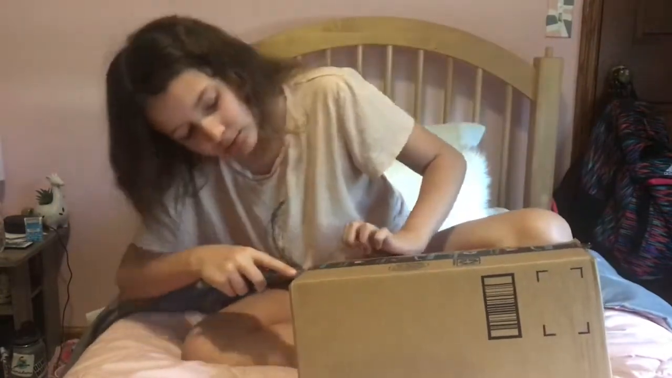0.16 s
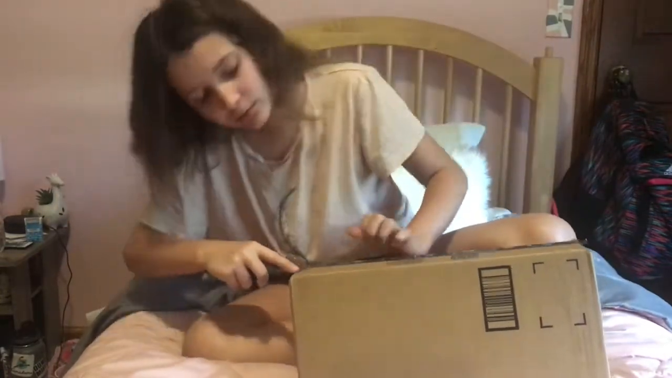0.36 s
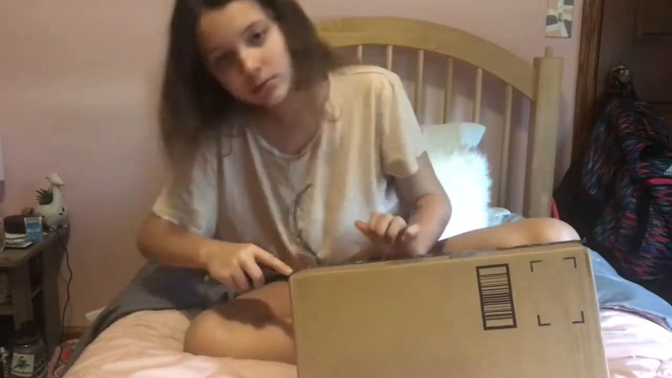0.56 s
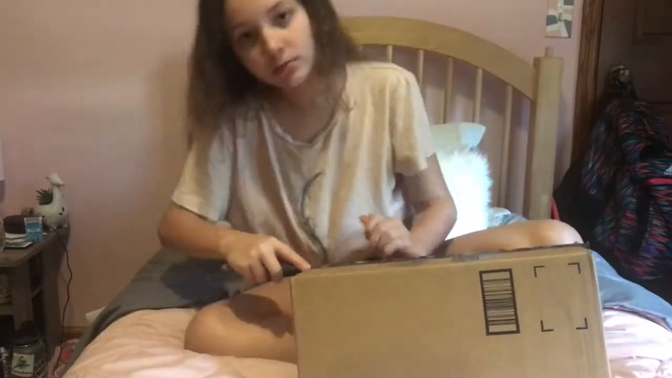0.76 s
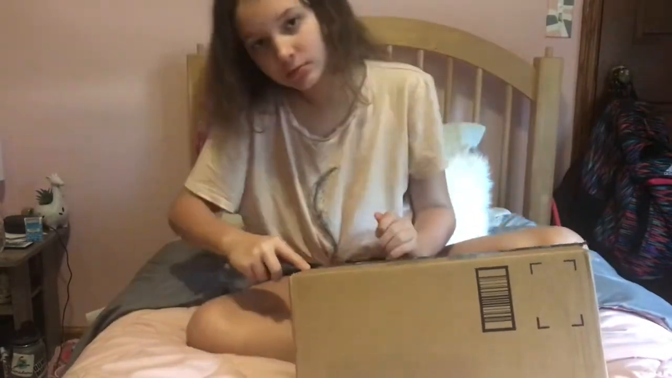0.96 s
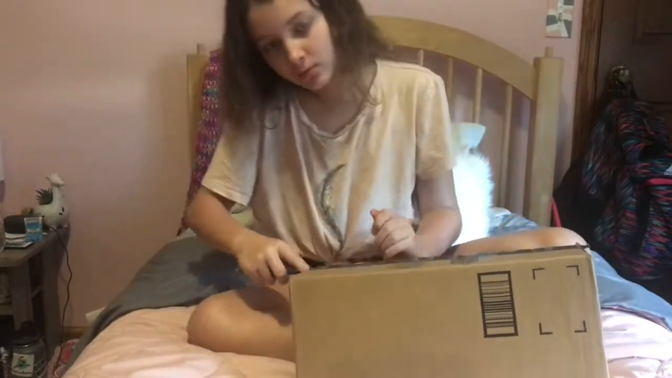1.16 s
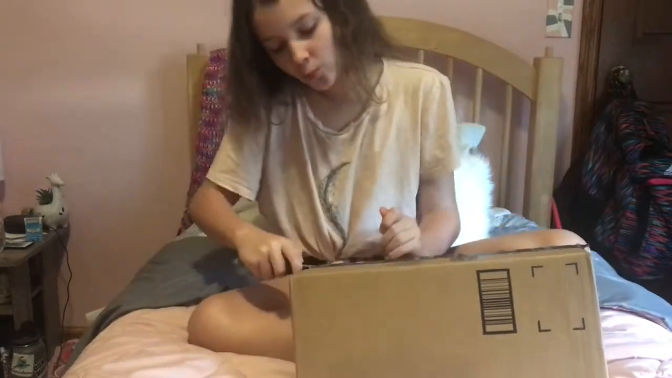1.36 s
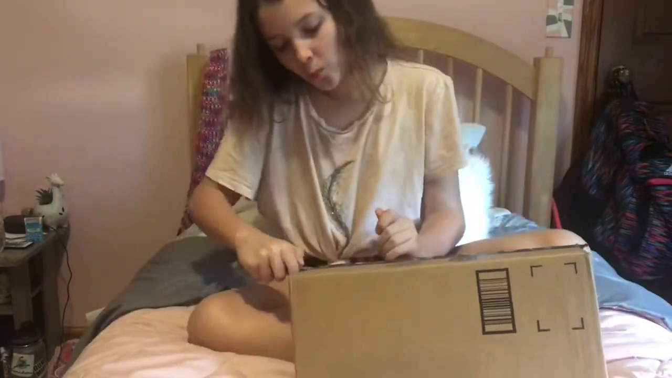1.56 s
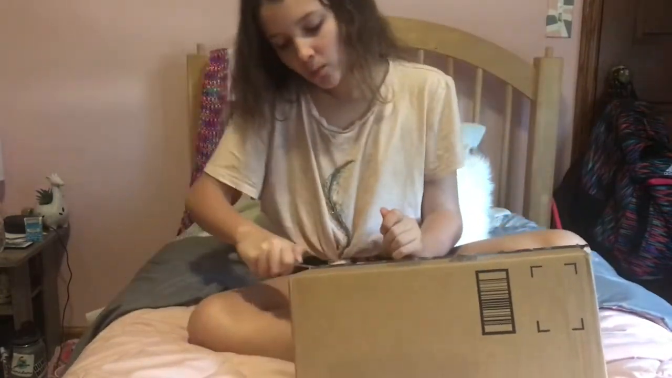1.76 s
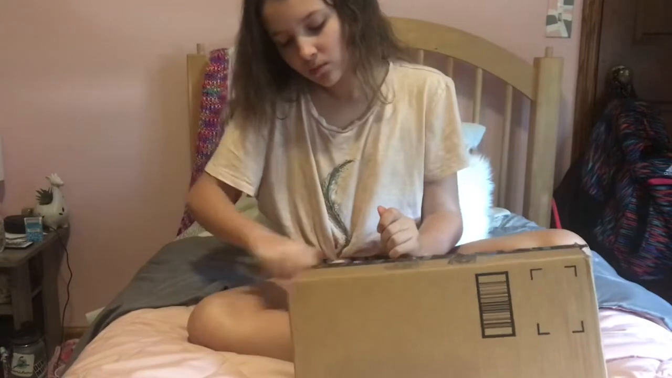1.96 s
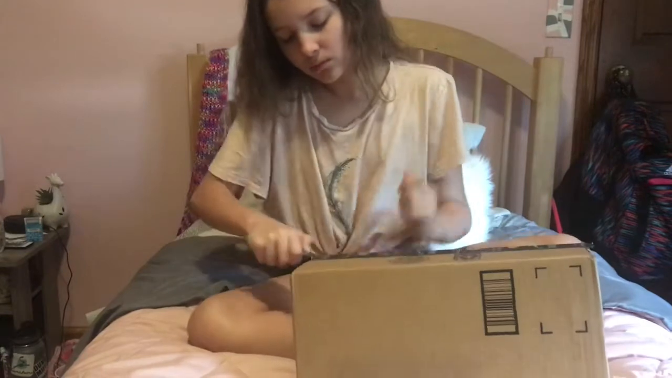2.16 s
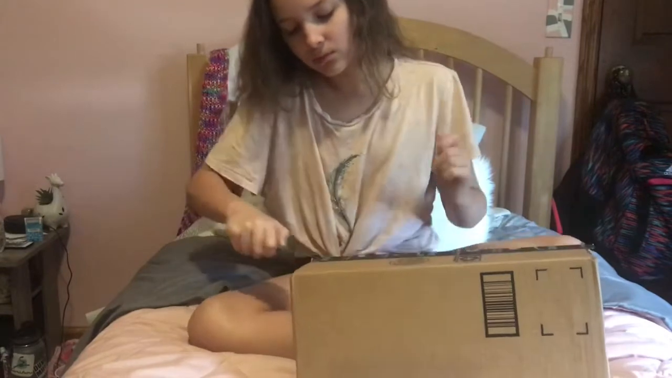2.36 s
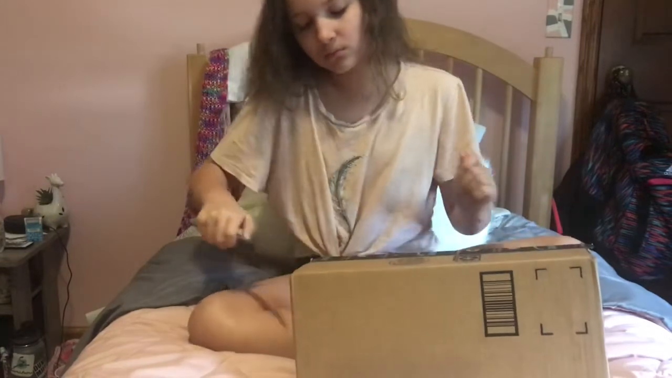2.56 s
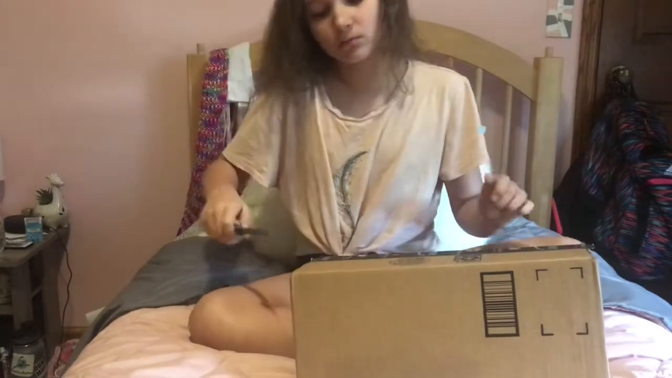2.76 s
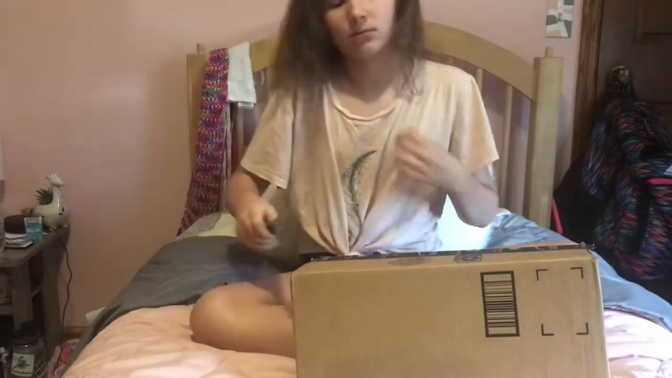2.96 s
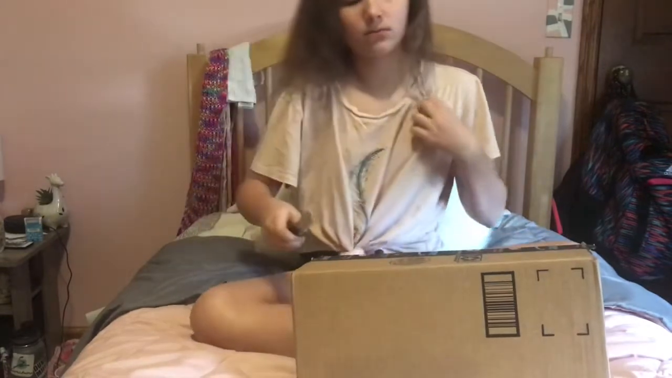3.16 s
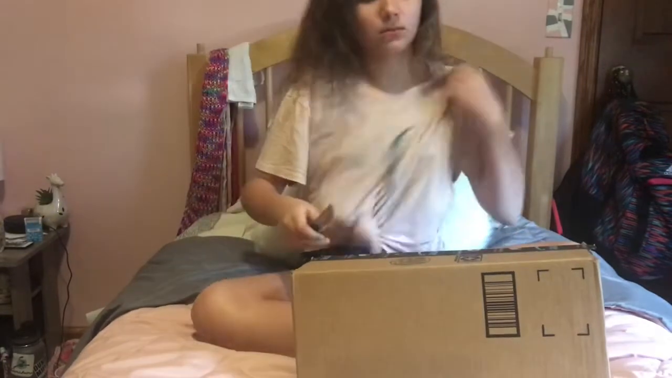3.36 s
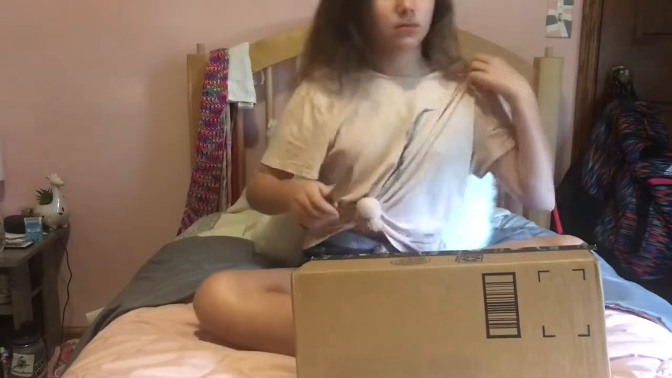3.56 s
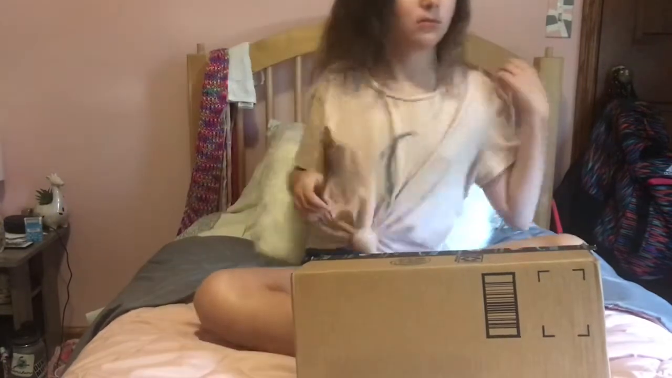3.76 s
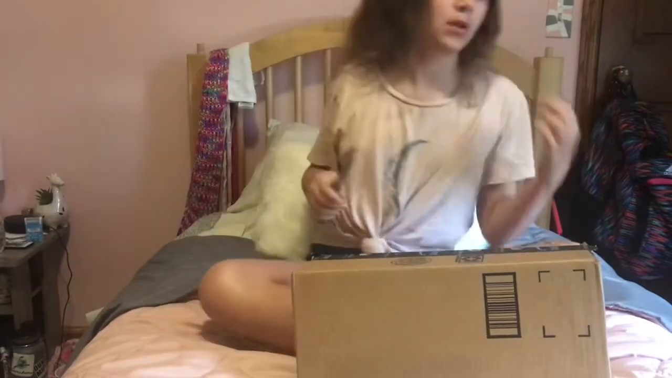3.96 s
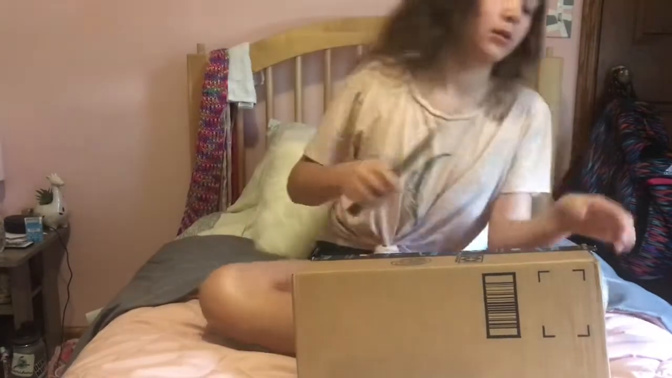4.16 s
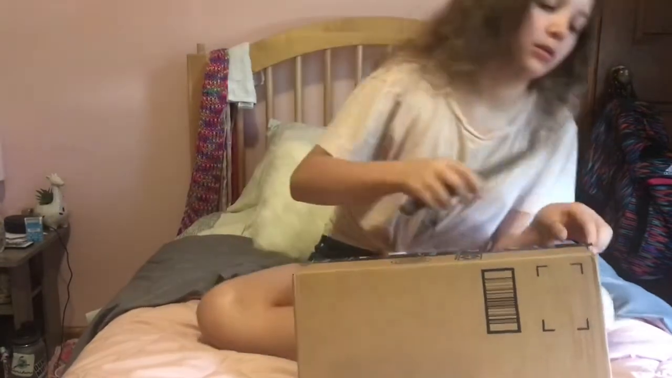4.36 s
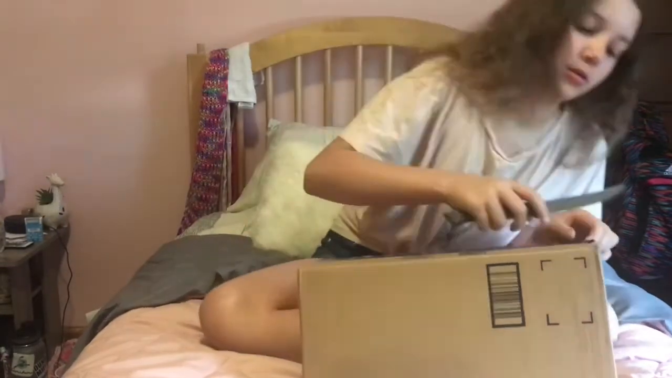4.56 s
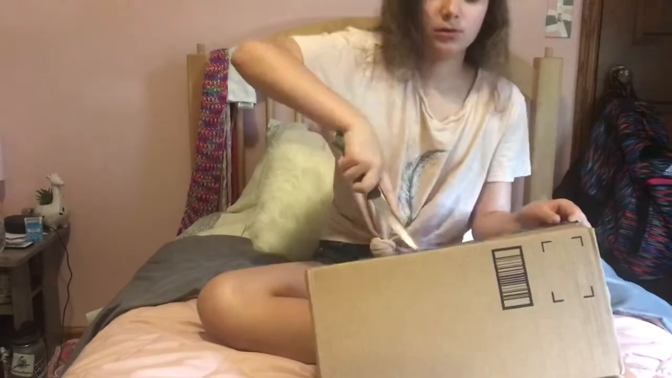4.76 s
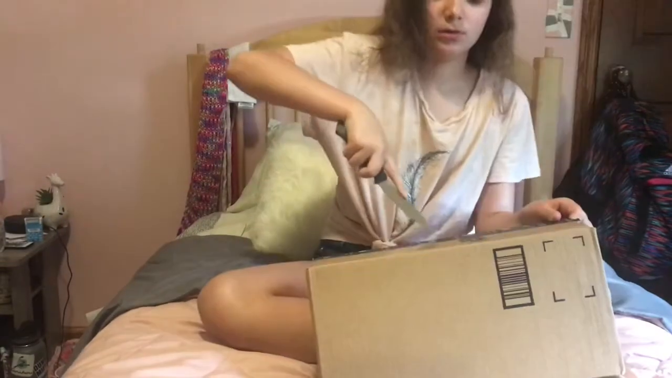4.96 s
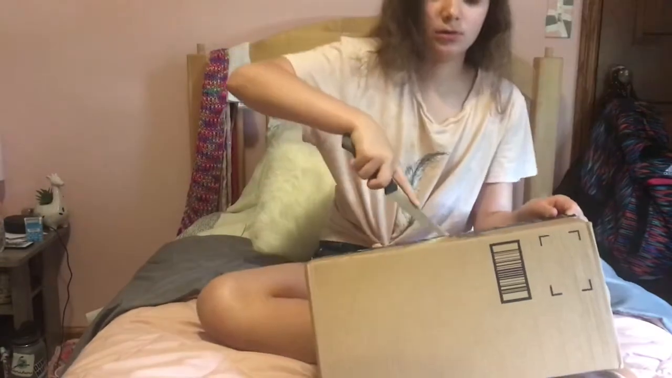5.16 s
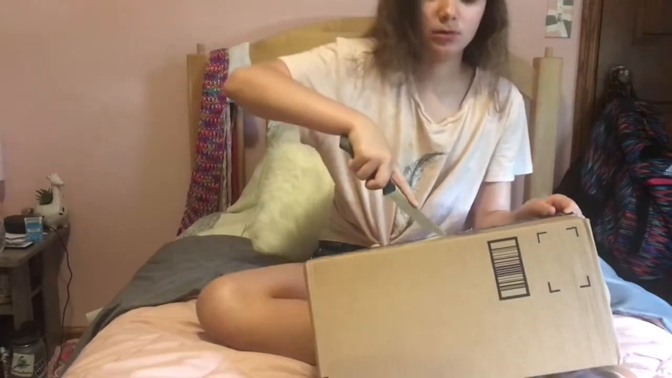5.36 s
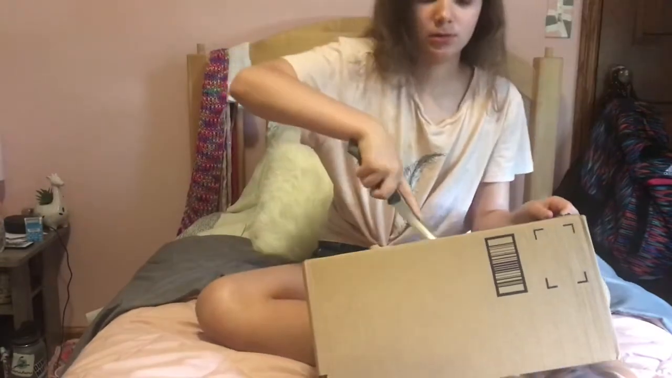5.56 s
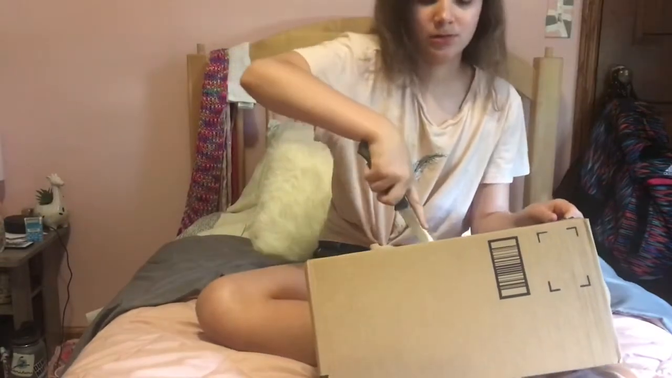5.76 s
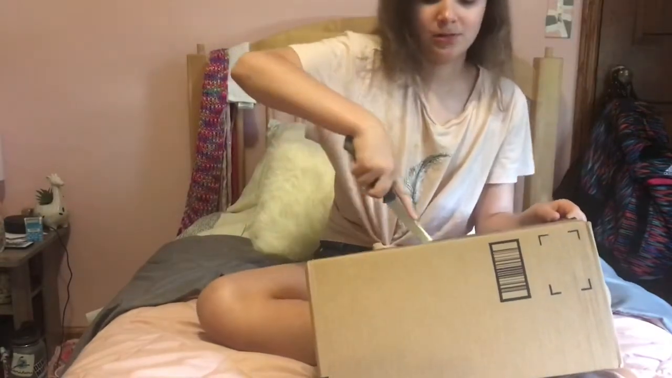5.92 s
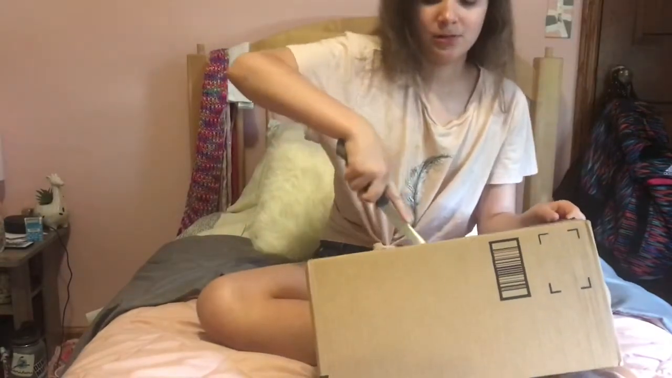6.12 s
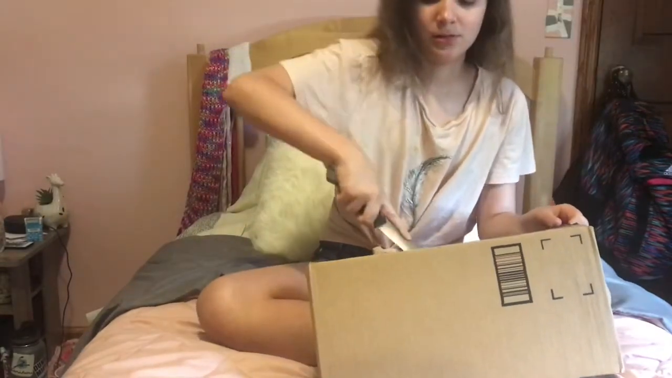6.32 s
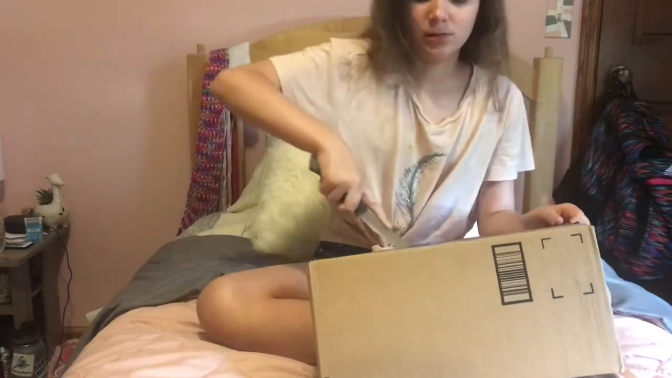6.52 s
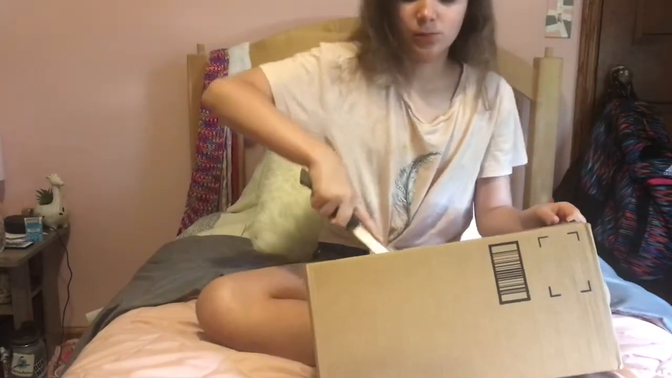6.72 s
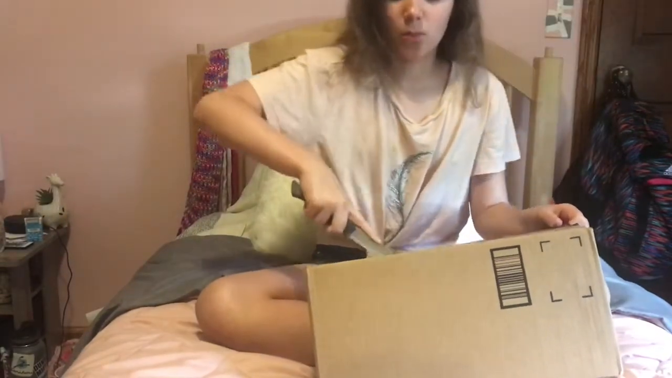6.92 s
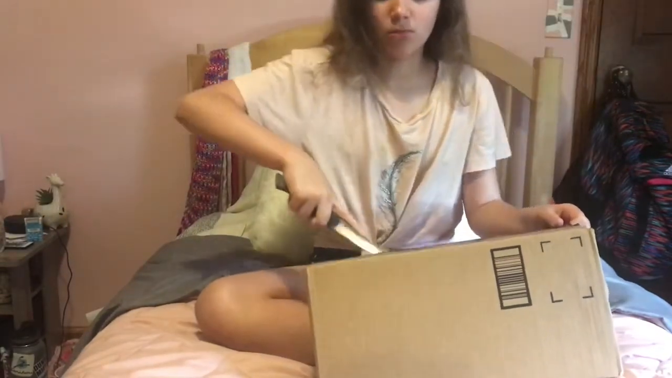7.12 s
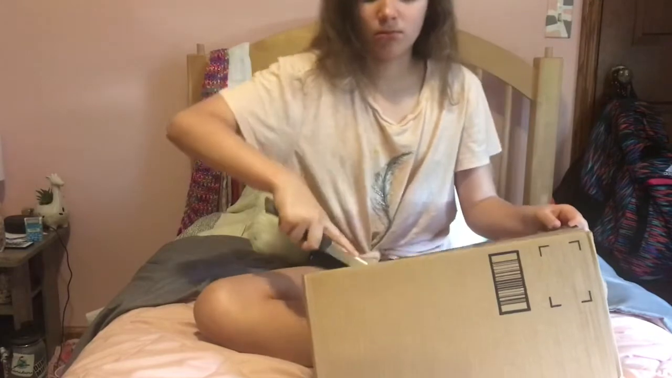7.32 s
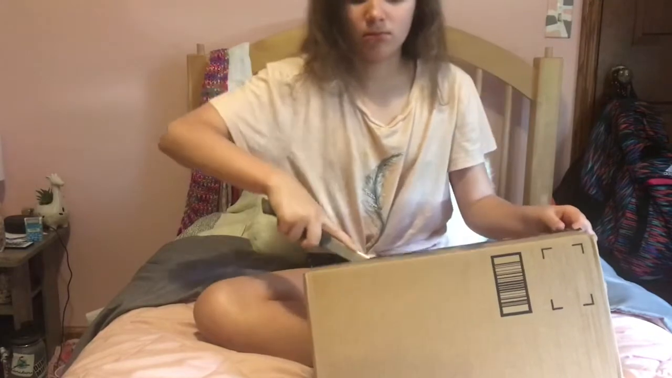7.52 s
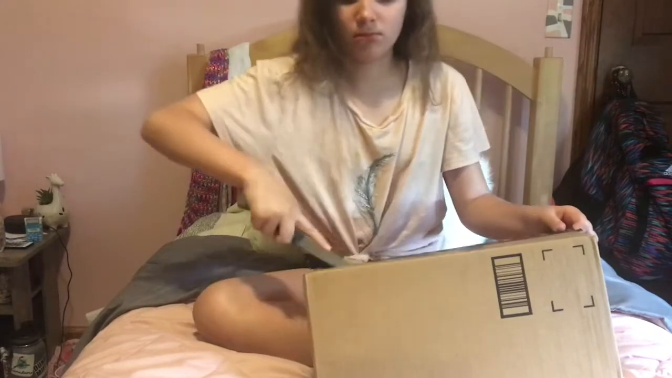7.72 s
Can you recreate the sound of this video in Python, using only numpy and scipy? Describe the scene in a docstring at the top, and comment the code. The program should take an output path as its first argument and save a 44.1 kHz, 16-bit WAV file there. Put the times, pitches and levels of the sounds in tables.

```python
"""Tape snaps, a hollow box drums, a knife rasps along the seam and squeaks, over mains hum and faint hiss.
A knife tip is pushed and sawn through packing tape on a cardboard box in a small soft bedroom.
Snaps and knocks are pushes and noise bursts ringing box modes; rubbing is uneven grit through the same modes.
Squeaks are trembling sines; the room is decaying banded noise convolved with the box and squeaks."""
import sys
import numpy as np
from scipy import signal
from scipy.fft import rfft, irfft
from scipy.io import wavfile
from scipy.ndimage import uniform_filter1d

SR = 44100
rng = np.random.default_rng(int(sys.argv[2]) if len(sys.argv) > 2 else 0)


def log_audio(samples):
    """Write samples as a 16-bit WAV file to the path given in sys.argv[1]."""
    # one column per channel
    frames = np.atleast_2d(samples).T
    # limit to full scale, then quantise
    limited = np.clip(frames, -1, 1)
    pcm = np.round(limited * 32767).astype(np.int16)
    wavfile.write(sys.argv[1], SR, pcm)


N = 347728

# modes of the hollow box: f/Hz, level/dB, t60/s (nominal; some sources shorten it)
DRUM_MODES = [(140, -30, 0.33), (195.5, -0.5, 0.11), (247, 3, 0.044), (272.3, -0.5, 0.041),
              (308, -0.5, 0.077), (385, -3.5, 0.061), (433.7, 1, 0.048), (541, 2, 0.033),
              (562, -4.5, 0.0092)]
# modes of the card panels: f/Hz, level/dB, t60/s (nominal; some sources shorten it)
PANEL_MODES = [(660, 1.5, 0.011), (761, -5.5, .03), (889, -12, 0.064), (1036, -4, 0.017),
               (1180, -6.5, 0.018), (1345, -2.5, 0.011), (1440, 7, 0.0088), (1624, -2, 0.0085),
               (1745, 1.5, 0.0058), (1980, -7, 0.017), (2050, 0, 0.0085), (2135, -10, 0.016)]
# treble at the microphone, rippled by nearby surfaces: f/Hz, relative level/dB per Hz
TREBLE = [(1500, -16), (2400, -0.5), (3100, 2), (3900, -2), (4600, -2.5), (5300, -5), (6500, -2.5),
          (7600, -5.5), (8800, 0), (10500, -8.5), (12000, -5.5), (13300, -8), (14300, -11), (15800, -13)]


def undb(db):
    """Amplitude ratio of a level in dB."""
    return 10 ** (np.asarray(db) / 20)


def level(x, db):
    """Scale x to an RMS level in dB."""
    return x * undb(db) / np.sqrt(np.mean(x ** 2))


def colour(x, table, size=4096):
    """Minimum-phase filter of the (f/Hz, level/dB) points, by folded cepstrum; tap energy 1."""
    f_hz, gain_db = np.transpose(table)
    grid_hz = np.maximum(np.arange(size // 2 + 1) * SR / size, 1)
    cepstrum = irfft(np.log(undb(np.interp(np.log(grid_hz), np.log(f_hz), gain_db))))
    cepstrum[1:size // 2] *= 2
    cepstrum[size // 2 + 1:] = 0
    taps = irfft(np.exp(rfft(cepstrum)))
    taps = taps / np.sqrt(np.sum(taps ** 2))
    return signal.fftconvolve(x, taps)[:len(x)]


def ring(x, f_hz, t60_s):
    """One decaying mode, t60 at least 5 ms; a unit push starts a swing of size 1."""
    decay_per_sample = np.log(1000) / (max(t60_s, .005) * SR)
    pole = np.exp(2j * np.pi * f_hz / SR - decay_per_sample)
    return signal.lfilter([0, pole.imag], [1, -2 * pole.real, abs(pole) ** 2], x)


def walk(rate_hz):
    """Random levels held 1 / rate_hz and slewed twice; spread near 1."""
    hold = int(SR / rate_hz)
    steps = np.repeat(rng.standard_normal(N // hold + 1), hold)
    return 1.02 * uniform_filter1d(uniform_filter1d(steps, hold), hold)[:N]


def grit(scatter_db):
    """Noise of grains of uneven size, RMS 1."""
    grain_db = scatter_db * rng.exponential(size=N)
    return level(rng.standard_normal(N) * undb(grain_db), 0)


def blows(modes, at, db, tilt_db_per_oct, judder_s, clean, scatter_db=3.0):
    """Each blow excites the modes in its own mix; share `clean` is one push, the rest noisy judder."""
    scatter = scatter_db * rng.standard_normal((len(at), len(modes)))
    decay = np.exp(-1 / (max(judder_s, 1e-4) * SR))
    middle_oct = np.mean(np.log2(np.array(modes)[:, 0]))
    out = 0
    for k, (f_hz, mode_db, t60_s) in enumerate(modes):
        tilt_db = tilt_db_per_oct * (np.log2(f_hz) - middle_oct)
        push = np.zeros(N)
        push[at] = undb(db + mode_db + tilt_db + scatter[:, k])
        envelope = signal.lfilter([np.sqrt(1 - decay ** 2)], [1, -decay], push)
        shake = envelope * rng.standard_normal(N)
        out = out + ring(clean * push + (1 - clean) * shake, f_hz, t60_s)
    return out


def background():
    """Mains hum with two weaker wavering tones (noise-driven resonances), over rumble and hiss."""
    # two wavering tones, then the hum (only its level is used): f/Hz, level/dB
    hum_tones = [(59.2, -66), (86.1, -97), (118.4, -54.5)]
    # rumble and hiss: f/Hz, relative level/dB per Hz
    air = [(15, -33), (25, -11), (64, -26), (94, -12), (123, -9), (149, -24), (175, -25.5), (263, -24),
           (463, -31), (1100, -33), (4870, -44.5), (12900, -46.5), (16000, -56)]
    hum_hz, air_db = 119.9, -63.5
    t = np.arange(N) / SR
    hum = level(np.sin(2 * np.pi * hum_hz * t), hum_tones[2][1] + 0.87)
    hum = hum * undb(0.29 * walk(2))
    wavering = sum(level(ring(rng.standard_normal(N), f_hz, 0.65), db) for f_hz, db in hum_tones[:2])
    hiss = level(colour(rng.standard_normal(N), air, size=16384), air_db)
    return hum + wavering + hiss


def tail():
    """Soft walls: octave bands of noise, each dying at its own pace, after a soft onset; energy 1."""
    # room decay: f/Hz, t60/s
    room_t60 = [(150, 0.29), (700, 0.39), (2000, 0.39), (5000, 0.39), (13000, 0.25)]
    onset_s = 0.007
    t = np.arange(int(.5 * SR)) / SR
    table_hz, table_t60_s = np.transpose(room_t60)
    out = 0
    for f_hz in 88 * 2. ** np.arange(8):
        edges_hz = [f_hz / np.sqrt(2), f_hz * np.sqrt(2)]
        band = signal.butter(2, edges_hz, "band", fs=SR, output="sos")
        t60_s = np.interp(np.log(f_hz), np.log(table_hz), table_t60_s)
        out = out + 1000. ** (-t / t60_s) * signal.sosfilt(band, rng.standard_normal(len(t)))
    out = out * (1 - np.exp(-(t / onset_s) ** 2))
    return out / np.sqrt(np.sum(out ** 2))


def room(x):
    """Room answer: two independent noise tails, slowly exchanged while the sound runs."""
    room_db, exchange_hz = -5, .4
    turn = 2 * np.pi * exchange_hz * np.arange(N) / SR
    shares = (np.cos(turn), np.sin(turn))
    return undb(room_db) * sum(signal.fftconvolve(x * share, tail())[:N] for share in shares)


def squeaks():
    """The blade sticks and slips almost evenly: short rough sines of trembling pitch and size."""
    # t/s, length/s, centre f/Hz, level/dB (before swell), pitch tremble/share
    squeak_rows = [(.045, .11, 520, -50, .12), (.665, .03, 310, -45, .1), (1.775, .035, 440, -44, .1),
                   (1.922, .042, 1170, -31, .07), (2.08, .08, 3450, -48, .1),
                   (2.283, .048, 880, -47.5, .06), (3.977, .018, 4100, -52, .05),
                   (4.05, .3, 1700, -67, .07), (4.475, .06, 1450, -62, .07), (7.25, .015, 2070, -33, .03)]
    out = np.zeros(N)
    waver = walk(1100)
    swell = undb(0.91 * walk(90))
    for t_s, length_s, f_hz, db, tremble in squeak_rows:
        i, n = int(t_s * SR), int(length_s * SR)
        pitch_hz = f_hz * (1 + tremble * waver[i:i + n])
        phase = 2 * np.pi * np.cumsum(pitch_hz) / SR
        out[i:i + n] += undb(db) * np.hanning(n) ** .5 * swell[i:i + n] * np.sin(phase)
    return out


def knocks():
    """Dull knocks of hand or handle: a soft juddering push rings the middle modes of the box."""
    # t/s, level/dB, judder/s
    knock_rows = [(1.156, -44, 0.016), (3.149, -44.5, 0.024), (3.408, -50, 0.041), (4.218, -62, 0.024)]
    best_hz, width_oct, rise_s = 850, .8, .004  # where a soft push drives the box best
    t = np.arange(N) / SR
    push = 0
    for t_s, db, judder_s in knock_rows:
        rise = np.clip((t - t_s) / rise_s, 0, 1)
        push = push + undb(db) * rise * np.exp(-np.maximum(t - t_s, 0) / judder_s)
    impulse = (np.arange(int(.2 * SR)) == 0) * 1.
    body = 0
    for f_hz, db, t60_s in DRUM_MODES + PANEL_MODES:
        drive = np.exp(-(np.log2(f_hz / best_hz) / width_oct) ** 2)
        body = body + undb(db) * drive * ring(impulse, f_hz, 0.4 * t60_s)
    body = body / np.sqrt(np.sum(body ** 2))
    return signal.fftconvolve(push * grit(3.2), body)[:N]


def rubbing():
    """Blade and hands rub card and tape: dense uneven grit drives the box modes and hisses off the tape."""
    # slow drags, swelling and fading: middle t/s, half length/s, drum/dB, panel/dB, bright hiss/dB
    drags = [(0.038, .12, -52, -54, -60.5), (0.245, 0.044, -65, -71, -75), (0.448, 0.086, -54, -57.5, -64),
             (0.68, 0.076, -53, -56, -56.5), (0.902, 0.054, -68, -75, -56.5),
             (1.138, 0.12, -61, -64.5, -80), (1.349, 0.062, -80, -74, -58.5),
             (1.497, 0.21, -65.5, -67, -80), (1.584, 0.067, -80.5, -60.5, -65),
             (1.765, 0.067, -50, -55, -59.5), (2.088, 0.072, -55, -46.5, -57),
             (2.242, 0.083, -62, -55.5, -70.5), (2.319, 0.031, -67, -51.5, -56.5),
             (4.066, 0.17, -80, -69, -76.5), (4.458, 0.26, -67.5, -69, -71.5), (4.7, 0.13, -63, -68, -70),
             (5.058, 0.13, -63, -68.5, -78), (5.53, 0.12, -69, -74.5, -70), (5.717, 0.19, -58, -59.5, -70),
             (5.945, 0.092, -50, -59.5, -63.5), (6.276, 0.038, -63, -53, -58),
             (6.403, 0.033, -51, -57, -54.5), (6.496, 0.074, -48.5, -51.5, -52.5),
             (6.77, 0.086, -49, -49, -64), (7.09, 0.15, -54, -56.5, -56), (7.608, 0.11, -52.5, -55, -55.5),
             (7.745, 0.1, -57, -61, -82)]
    # rasps as the blade bites: t/s, hold/s, fall t60/s, drum/dB, panel/dB, bright hiss/dB
    rasps = [(0.318, 0.018, 0.093, -65, -64, -58), (0.426, 0.013, 0.094, -55, -57, -56),
             (.788, 0.011, 0.092, -71, -57, -53), (0.817, 0.0098, 0.38, -45, -45, -54),
             (1.882, 0.095, 0.11, -41.5, -44, -48), (3.975, 0.013, 0.11, -88, -66.5, -67),
             (4.627, 0.037, 0.13, -41, -52, -56), (5.516, 0.02, .1, -56, -62.5, -65),
             (5.552, 0.0055, 0.12, -41, -39, -52), (5.841, 0.028, 0.28, -62, -58, -50.5),
             (6.155, 0.017, 0.043, -45, -44, -49), (6.677, .019, 0.085, -50, -44, -49),
             (7.226, 0.051, 0.24, -38, -41.5, -43.5), (7.713, 0.011, 0.074, -37.5, -55, -52),
             (7.824, .032, 0.15, -42, -49, -54)]
    # dry edge sliding on the tape's skin: f/Hz, relative level/dB per Hz
    sheen = [(5000, -30), (7000, -12), (8800, -5), (9700, -3), (10600, -6), (12000, 0), (13300, -6),
             (14200, -2), (15000, -5), (15800, -8)]
    bite_s = 0.0077  # rise of a rasp
    dull_db = -2.5  # dull hiss, relative to midway between panel and bright hiss
    t = np.arange(N) / SR

    def gains(drum_db, panel_db, bright_db):
        """Column of gains: drum, panel, dull hiss, bright hiss."""
        return undb([drum_db, panel_db, (panel_db + bright_db) / 2 + dull_db, bright_db])[:, None]

    force = np.zeros((4, N))
    for middle_s, half_s, *db in drags:
        force += np.exp(-((t - middle_s) / half_s) ** 2) * gains(*db)
    for t_s, hold_s, fall_s, *db in rasps:
        rise = np.clip((t - t_s) / bite_s, 0, 1)
        fall = 1000. ** (-np.maximum(t - t_s - bite_s - hold_s, 0) / fall_s)
        force += rise * fall * gains(*db)

    catch = undb(2.6 * walk(90))  # uneven grip shared by drum, panel and dull hiss
    # the lowest drum mode is not rubbed
    drum = sum(undb(db) * ring(catch * grit(1.0), f_hz, 0.9 * t60_s) for f_hz, db, t60_s in DRUM_MODES[1:])
    panel = sum(undb(db) * ring(catch * grit(2.4), f_hz, 0.82 * t60_s) for f_hz, db, t60_s in PANEL_MODES)
    lowpass = signal.butter(3, 7000, fs=SR, output="sos")
    dull = signal.sosfilt(lowpass, colour(catch * grit(2.1), TREBLE))
    bright = colour(undb(1.5 * walk(90)) * grit(1.5), sheen)
    return sum(f * level(x, 0) for f, x in zip(force, (drum, panel, dull, bright)))


def snaps():
    """Click, splinter, dying crackle; panels ring at once, hollow box a moment later, mattress thumps."""
    # tape snaps and knocks on the box: t/s, crack/dB, drum/dB, panel/dB, drum tilt/dB per octave
    snap_rows = [(0.2221, -47, -49.5, -56.5, -4), (0.4326, -28, -43, -44, -27),
                 (0.6215, -54, -54, -73, -25), (0.6586, -45, -47, -68, -19), (0.826, -25.5, -41, -42.5, 1),
                 (0.8453, -52, -55, -55, -3), (0.891, -31, -47, -41, -4), (1.1595, -61, -52.5, -55, 20),
                 (1.3133, -25, -42, -30.5, 9), (1.5903, -43.5, -46.5, -57.5, 7),
                 (1.8936, -27, -39, -41.5, -4), (1.9183, -33, -36.5, -32, -6),
                 (1.9653, -16, -18, -24.5, -2), (1.9752, -45, -23, -34, 1), (2.0107, -40, -30, -54.5, 5),
                 (2.2186, -65, -54, -57, 5), (3.1552, -48, -51.5, -60, -5), (3.4155, -61, -55.5, -62, 6),
                 (3.8953, -56, -77, -79, 4), (3.962, -51, -80, -73, -1), (3.979, -37, -80, -72, 1.1),
                 (4.217, -52, -53.5, -58.5, 4), (4.355, -48.5, -75, -55, 2), (4.4794, -55, -56.5, -51, 15),
                 (4.6437, -30, -37, -45, -13.5), (4.81, -50, -58.5, -51, 15),
                 (5.004, -45.5, -67, -47.5, .6), (5.1225, -53, -50.5, -67, 0),
                 (5.2322, -35.5, -37.5, -45.5, 4), (5.2716, -68, -45, -61, 9),
                 (5.558, -28.5, -50, -48.5, -.6), (5.5947, -11.5, -21, -20, -5.5),
                 (5.6359, -27, -27.5, -31, -9), (5.732, -38.5, -53, -55, -3), (5.751, -58, -71.5, -44, -.6),
                 (5.8576, -38, -70, -59, -.6), (6.0453, -47, -61.5, -52, -4),
                 (6.1818, -12, -24.5, -22, 9.5), (6.1955, -20, -27.5, -52, -3),
                 (6.3316, -31, -60, -45, 1.1), (6.427, -50, -66, -49, 4), (6.651, -37, -62, -54, -.6),
                 (6.6918, -27, -41, -44, -3), (6.7116, -7.5, -18, -19.5, -4), (6.7508, -26, -49.5, -35, 3),
                 (6.929, -27, -78, -43.5, -1), (7.2519, -24.5, -44, -41, -7),
                 (7.2843, -18, -26.5, -24.5, 8), (7.31, -27, -41, -37, -5), (7.5305, -37.5, -54, -45, 7),
                 (7.7191, -42, -48, -39.5, 6), (7.8032, -38, -68, -61, -1), (7.8289, -28, -41, -52, 13)]
    # the box is pressed into the mattress: t/s, level/dB
    thumps = [(.226, -46), (0.437, -44), (.663, -60), (.83, -40), (.85, -51), (1.163, -51), (1.318, -47),
              (1.595, -55.5), (1.923, -38), (1.972, -44), (5.562, -53), (5.6, -54), (5.64, -56),
              (6.186, -46), (6.214, -56), (6.715, -63), (7.314, -42)]
    # mattress modes: f/Hz, level/dB, t60/s
    mattress = [(62.4, 0, 0.16), (86, 0, 0.24)]
    crackle_db, splinter_db, click_db = -10.5, -11.5, 8.5  # relative to the crack
    rise_s, splinter_s, crackle_t60_s = 0.00051, 0.00072, 0.024
    click_delay_s, drum_delay_s = .0005, .0025
    t_s, crack_db, drum_db, panel_db, tilt_db_per_oct = np.transpose(snap_rows)
    at = (t_s * SR).astype(int)
    t = np.arange(int(.15 * SR)) / SR
    rise = 1 - np.exp(-t / rise_s)

    give, click = np.zeros(N), np.zeros(N)
    give[at] = undb(crack_db)
    click[at + int(click_delay_s * SR)] = undb(crack_db + click_db)
    splinter_shape = undb(splinter_db) * rise * np.exp(-t / splinter_s)
    splinter = signal.fftconvolve(give, splinter_shape)[:N]
    crackle_shape = undb(crackle_db) * rise * 1000. ** (-t / crackle_t60_s)
    crackle = signal.fftconvolve(give, crackle_shape)[:N]
    crack = colour(click + crackle * grit(0.95), TREBLE)

    pressed_s, thump_db = np.transpose(thumps)
    thump = blows(mattress, (pressed_s * SR).astype(int), thump_db, 0, 0.001, 0.92)
    drum = blows(DRUM_MODES, at + int(drum_delay_s * SR), drum_db, tilt_db_per_oct, 0.00068, 0.54)
    # keep the boom compact, between 150 and 520 Hz
    drum = signal.sosfilt(signal.butter(2, [150, 520], "band", fs=SR, output="sos"), drum)
    panel = blows(PANEL_MODES, at, panel_db, -0.4, 0.0089, 0.22)
    return crack + thump + drum + panel, colour(splinter * grit(1.4), TREBLE)


def scene():
    """Sum of direct sources, room answer and background, one channel."""
    snap, splinter = snaps()
    box = snap + knocks() + rubbing()
    squeak = squeaks()
    # splinter is heard dry, and squeaks with half the room
    direct = box + splinter + squeak
    return (direct + room(box + squeak / 2) + background())[None]


def record(dry):
    """Microphone bass cut, one brief fade-out and return, then the top cut."""
    bass_cut_hz, top_hz = 56, 15900
    dip_s, fall_s, rise_s = 4.62, .022, .004
    gain = np.interp(np.arange(N) / SR, [dip_s - fall_s, dip_s, dip_s + rise_s], [1, 0, 1])
    highpass = signal.butter(3, bass_cut_hz, "high", fs=SR, output="sos")
    sound = gain * signal.sosfilt(highpass, dry)
    lowpass = signal.ellip(10, .2, 70, top_hz, fs=SR, output="sos")
    return signal.sosfilt(lowpass, sound)


dry = scene()
out = record(dry)
log_audio(out)
```